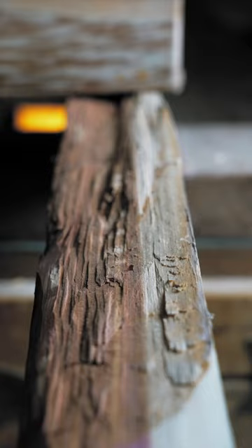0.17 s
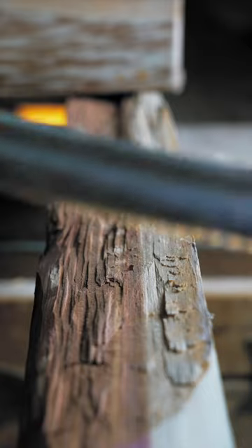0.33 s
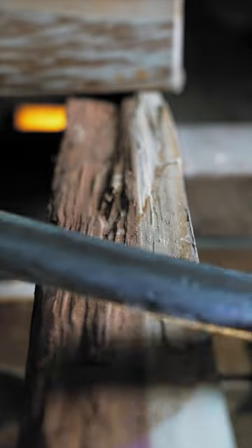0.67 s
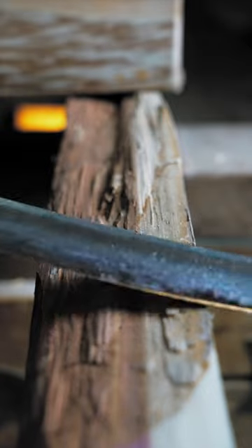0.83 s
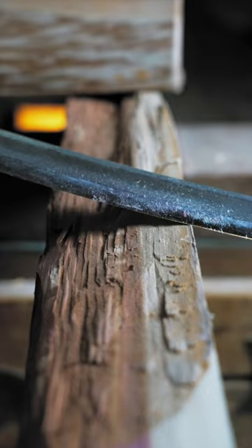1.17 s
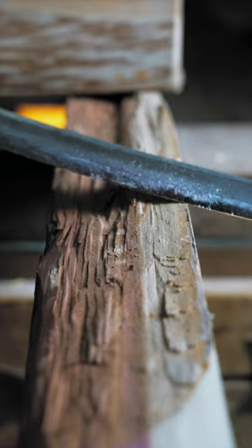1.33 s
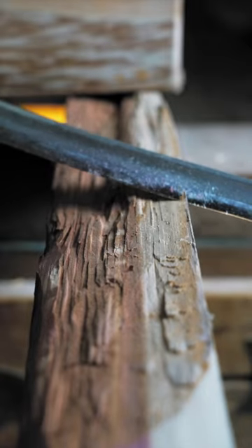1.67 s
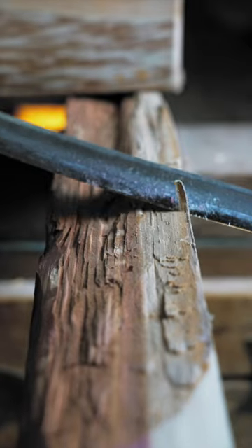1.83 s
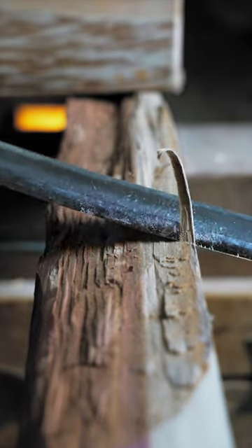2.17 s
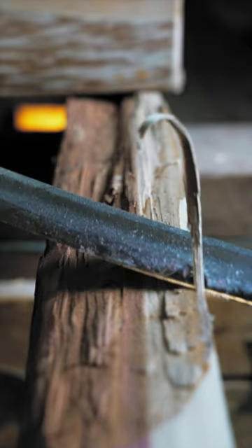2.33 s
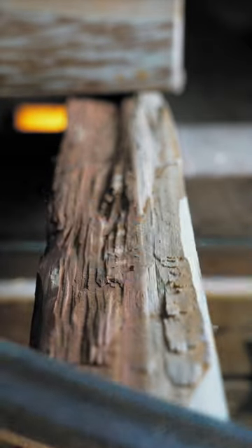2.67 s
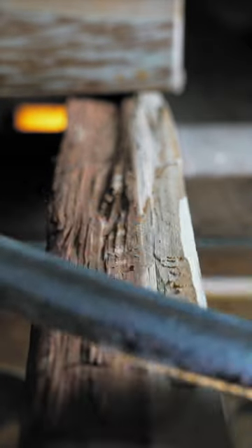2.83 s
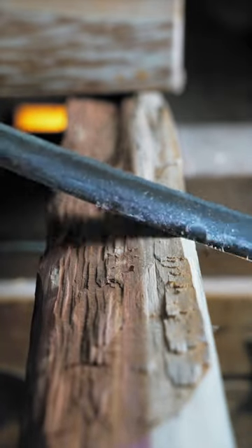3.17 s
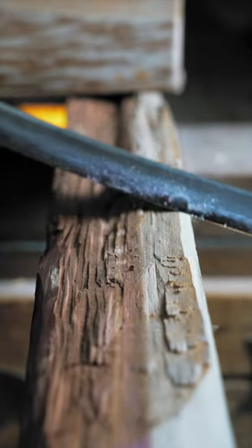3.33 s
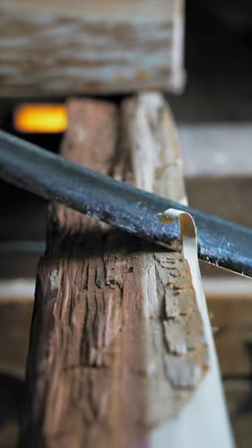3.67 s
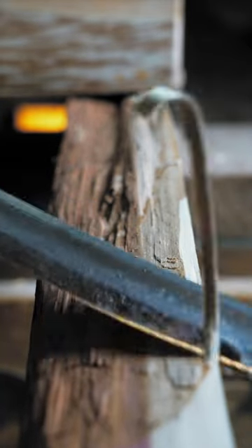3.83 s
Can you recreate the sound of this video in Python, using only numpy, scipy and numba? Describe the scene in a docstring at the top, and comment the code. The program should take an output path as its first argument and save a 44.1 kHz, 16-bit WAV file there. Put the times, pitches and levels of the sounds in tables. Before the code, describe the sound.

A drawknife rasps along wood twice, shavings crackling, with knocks between the cuts.

```python
"""In a quiet workshop, close up, a drawknife is pulled twice along a wooden stave.
The edge sticks and slips, so blade and stave ring with a rasp and the bench shudders.
Fibres crackle and snap as each shaving peels off. Around the cuts the blade slides lightly,
chips rustle, the bench thuds on the floor, and the stave knocks when the blade is set on it.
Behind it all lie a short room echo, soft air noise and a faint electrical whine."""
import sys
import numpy as np
from scipy import signal
from scipy.fft import rfft, irfft
from scipy.io import wavfile
from scipy.ndimage import uniform_filter1d
from numba import njit

SR = 44100
rng = np.random.default_rng(int(sys.argv[2]) if len(sys.argv) > 2 else 0)


def unload_wav(signal):
    """Save mono or channel-first audio to the path in sys.argv[1] as 16-bit WAV at rate SR, clipped to [-1, 1]."""
    wavfile.write(
        sys.argv[1],
        SR,
        np.round(np.clip(np.atleast_2d(signal).T, -1, 1) * 32767).astype(np.int16),
    )


N = 176400  # 4 seconds

# In the tables t is time and f is frequency. Levels are relative: the functions scale them further.
# tone of the still air: f/Hz, level/dB
AIR_TONE = [(20, 2), (60, 1), (130, -3.5), (220, -3.5), (310, -14), (400, -2.5), (480, 0.5), (570, -14),
            (900, -20.5), (2000, -32), (5500, -32.5), (8400, -37), (9500, -34), (12000, -36.5),
            (14200, -30), (16000, -38.5)]
# electrical whine: f/Hz, level/dB
WHINE_TONES = [(7127, -95.5), (14250, -102)]
# the bench thuds on the floor: t/s, level/dB, decay/s, boom f/Hz
FLOOR_THUDS = [(.53, -47, 0.079, 100), (.59, -48.5, 0.085, 83.7), (0.859, -47, 0.063, 55.3),
               (1.835, -58, 0.26, 44.6), (2.241, -60, 0.044, 70.7), (2.644, -46.5, 0.032, 76),
               (3.209, -47.5, 0.093, 69.1), (3.677, -53.5, 0.066, 90.3)]
# tone of the thuds and the rumble: f/Hz, level/dB
THUD_TONE = [(20, -8), (50, 1.5), (80, -2.5), (110, -7.5), (140, -11), (200, -7.5), (300, -21.5),
             (600, -43), (2000, -69.5)]
# loose chips brushed aside: t/s, level/dB, decay/s, centre f/Hz
CHIP_RUSTLES = [(0.035, -72, 0.1, 10800), (.213, -64.5, 0.026, 8900), (1.165, -73, .015, 12100),
                (2.896, -70.5, 0.018, 5000), (3.139, -64, 0.063, 8850)]
# light slides of the blade: t/s, length/s, blade level/dB, bench level/dB
BLADE_SLIDES = [(0.026, 0.13, -80, -80), (0.846, 0.078, -65, -48.5), (1.102, .14, -76, -60.5),
                (1.255, .19, -77, -61.5), (2.838, .12, -86.5, -68.5), (2.965, .11, -80.5, -75.5)]
# notes that ring in the lightly held blade: f/Hz, width/Hz, level/dB
LOOSE_BLADE_NOTES = [(857, 98, 2.5), (1663, 120, -1), (1814, 70, 0), (2600, 220, 0), (3680, 790, -9),
                     (4380, 114, -8.5), (6460, 2400, -20)]
# notes that ring in stave and bench at pitch ratio 1: f/Hz, level/dB, time to fade by 60 dB/s
BENCH_NOTES = [(74.2, -28.5, 0.35), (184.6, -22, 0.31), (295.4, -14, 0.24), (329, -19, 0.38),
               (413.7, -13, 0.29), (444.7, -4.5, .23), (475, -9, 0.22), (522.6, -13.5, 0.17),
               (676, -24.5, 0.13), (869, -28.5, .15)]
# knocks on the stave: t/s, knock level/dB, crack level/dB, pitch ratio
STAVE_KNOCKS = [(.855, -29.5, -63, 0.92), (.886, -36.5, -62, .96), (2.586, -46, -75, 1.0),
                (2.644, -44, -47.5, 0.97), (3.035, -49, -75, 0.8), (3.202, -15.5, -23.5, 1.017),
                (3.252, -30.5, -56, 1.04)]
# tone of the crack as the blade lands: f/Hz, level/dB
CRACK_TONE = [(100, -6), (350, 5.5), (600, -2), (900, 1), (1350, -0.5), (1600, -3.5), (1850, -6),
              (2100, -16.5), (2600, -10), (3200, -17.5), (4200, -18), (5500, -36), (15000, -46)]
# splinters snapping: t/s, level/dB, centre f/Hz, decay/ms
SPLINTERS = [(0.1023, -50, 8500, 1.4), (.196, -46, 10000, .4), (0.2004, -38, 11500, 0.52),
             (0.214, -35, 12500, 0.63), (1.8075, -41.5, 13000, 1.5), (1.815, -51, 14000, 1),
             (1.85, -36.5, 11900, 0.65), (1.862, -34.5, 12000, 1.2), (1.8951, -32, 13000, 0.95),
             (1.9921, -29, 9000, 1.05), (1.999, -40, 10500, 0.53), (2.02, -35.5, 11000, 0.84),
             (2.121, -33, 14000, .8), (2.2285, -32, 8400, .7), (2.252, -32, 13100, 6.2),
             (2.275, -34, 12500, .6), (2.282, -23.5, 13500, 0.58), (2.336, -25, 13000, 3.6),
             (2.358, -23, 12500, 2), (2.406, -22, 11000, 0.75), (2.452, -34.5, 4800, 0.51),
             (2.456, -23, 5400, 0.52), (2.567, -39.5, 10000, 5.9), (2.596, -30, 8500, 1.35),
             (3.747, -24.5, 12000, 0.4), (3.7665, -21, 12500, 0.6), (3.772, -22.5, 12500, 0.79),
             (3.7973, -26, 14000, 1.7), (3.86, -25, 11600, 1.8), (3.8801, -21, 11500, 1.4),
             (3.977, -37, 8000, 1.5)]
# tone of breaking fibres: f/Hz, level/dB
FIBRE_TONE = [(500, -46), (2500, -19), (5500, -17.5), (7500, -11), (9000, -12), (12000, -3), (14500, -2),
              (16000, -5.5)]
# how hard the fibres tear in each cut: t/s, level/dB
FIRST_TEAR = [(1.58, -90), (1.8, -71), (1.855, -61), (1.893, -46), (1.92, -65), (1.98, -57), (2.015, -54.5),
              (2.185, -66), (2.22, -60), (2.255, -52), (2.328, -46), (2.338, -40), (2.403, -40),
              (2.425, -48.5), (2.48, -53.5), (2.55, -58), (2.6, -71), (2.7, -95)]
SECOND_TEAR = [(3.5, -98.5), (3.6, -66.5), (3.734, -45.5), (3.75, -35.5), (3.785, -41.5), (3.803, -36.5),
               (3.84, -41), (3.857, -33), (3.905, -54.5), (4.0, -59.5)]
# ringing shavings: start t/s, end t/s, start f/Hz, end f/Hz, level/dB above the tearing
SHAVING_GLIDES = [(2.325, 2.422, 13720, 9700, 2), (3.771, 3.833, 15000, 12700, 1)]
# notes that ring in blade and stave while cutting: f/Hz, width/Hz, level/dB
BLADE_NOTES = [(869, 60, 4.5), (949, 56, 2), (1163, 53, 3.5), (1287, 120, -14), (1820.5, 61, -2),
               (2394, 200, -30), (2610, 180, -11), (2840, 150, -21), (3637, 70, -2.5), (4390, 160, -20.5),
               (4697, 81, -10.5), (5585, 110, -24.5), (6310, 260, -13)]
# tone of the broad scrape under those notes: f/Hz, level/dB
SCRAPE_TONE = [(200, -33), (600, -7), (1200, -15), (1550, -18.5), (2500, -10), (4200, -14.5), (5200, -22),
               (8000, -20.5), (16000, -35)]
# how loud each cut is: t/s, rasp level/dB, shudder level/dB
FIRST_CUT = [(1.55, -100, -79), (1.65, -68, -69.5), (1.74, -64, -74), (1.9, -52.5, -64.5),
             (1.976, -62, -57), (2.0, -52.5, -62.5), (2.13, -62.5, -61.5), (2.184, -70, -77),
             (2.25, -50.5, -69), (2.298, -56, -54.5), (2.388, -59.5, -71.5), (2.422, -54, -46.5),
             (2.472, -55, -52), (2.548, -73.5, -69), (2.598, -54, -55.5), (2.628, -68, -60.5),
             (2.656, -66, -54), (2.722, -85.5, -60.5), (2.75, -83, -70)]
SECOND_CUT = [(3.48, -88, -101), (3.566, -57, -80), (3.618, -50, -58.5), (3.682, -51.5, -53.5),
              (3.736, -52, -61.5), (3.816, -48, -48), (3.876, -50.5, -48), (3.908, -62, -59),
              (4.0, -64.5, -72)]

SLIPS_PER_S, SLIP_SPREAD_DB = 5000, 3
FIBRES_PER_S, FIBRE_SPREAD_DB = 4500, 4
TIME = np.arange(N) / SR


def gain(db):
    """Turn decibels into a number to multiply by."""
    return 10 ** (np.asarray(db) / 20)


def unit(x):
    """Scale a sound so that its typical swing (rms) is 1."""
    return x / (np.std(x) + 1e-18)


def peak(x):
    """Scale a sound so that its biggest swing is 1."""
    return x / (np.abs(x).max() + 1e-18)


def clock(seconds):
    """The time of each sample in a short sound."""
    return np.arange(int(seconds * SR)) / SR


def add(out, at, x):
    """Mix x into out, starting at a time in seconds."""
    i = max(int(at * SR), 0)
    out[i:i + len(x)] += x[:len(out[i:])]


def through(x, response):
    """Let every sample of x set off its own copy of a ring or echo."""
    return signal.fftconvolve(x, response)[:len(x)]


def colour(x, tone, size=4096):
    """Make the lows and highs of x louder or softer, following a tone table."""
    hz, db = np.array(tone).T
    f = np.maximum(np.arange(size // 2 + 1) * SR / size, 1)
    curve = gain(np.interp(np.log(f), np.log(hz), db))
    # folding the cepstrum makes the filter ring only after a sound, never before it
    cepstrum = irfft(np.log(curve))
    cepstrum[1:size // 2] *= 2
    cepstrum[size // 2 + 1:] = 0
    return through(x, irfft(np.exp(rfft(cepstrum))))


@njit
def moving_band(x, hz, width):
    """A filter that lets through the sound near a pitch, given for each sample."""
    out, band_state, low_state = np.empty(len(x)), 0., 0.
    for i in range(len(x)):
        angle = 2 * np.pi * min(hz[i], .44 * SR) / SR
        step = np.tan(angle / 2)
        damping = 2 * np.pi * width / SR / np.sin(angle)
        swing = (band_state + step * (x[i] + 1e-18 - low_state)) / (1 + step * (step + damping))
        band_state = 2 * swing - band_state
        low_state += 2 * step * swing
        out[i] = damping * swing
    return out


def band(x, hz, *widths):
    """Keep the sound near a pitch, filtering once for each width in Hz."""
    for width in widths:
        x = moving_band(x, hz * np.ones(len(x)), float(width))
    return x


def wander(per_s):
    """A smooth random drift of typical size 1."""
    hold = int(SR / per_s)
    steps = np.repeat(rng.standard_normal(4000)[:N // hold + 1], hold)
    return unit(uniform_filter1d(steps, hold)[:N])


def clicks(per_s, spread_db):
    """Dense random clicks, most small and a few large."""
    size = gain(spread_db * np.minimum(rng.exponential(size=N), 4))
    return (rng.random(N) < per_s / SR) * size * rng.choice([-1, 1], N)


def effort(*curves, column=1):
    """Strength over time, joining the points in one level column of each table."""
    return sum(gain(np.interp(TIME, points[:, 0], points[:, column], left=-200, right=-200))
               for points in map(np.array, curves))


def gate(start, end, ramp_s):
    """Fade in, hold, fade out."""
    return np.clip(np.minimum(TIME - start, end - TIME) / ramp_s, 0, 1)


def room_tone(air_db=-66.5):
    """Still air with a faint electrical whine."""
    air = unit(colour(rng.standard_normal(N), AIR_TONE))
    whine = sum(np.sqrt(2) * gain(db) * np.sin(2 * np.pi * hz * TIME) for hz, db in WHINE_TONES)
    return gain(air_db) * air + whine


def room_echo(x, level_db=-12, low_fade_s=.34, high_fade_s=.18, rise_s=.0027):
    """Sound bounces around the workshop; the highs die away first."""
    t = clock(.6)
    noise = rng.standard_normal(len(t))
    low = signal.sosfilt(signal.butter(2, 4500, fs=SR, output="sos"), noise)
    tail = low * gain(-60 * t / low_fade_s) + (noise - low) * gain(-60 * t / high_fade_s)
    tail *= 1 - np.exp(-t / rise_s)
    return gain(level_db) * through(x, tail / np.linalg.norm(tail))


def thuds(rise_s=.0041):
    """The bench shifts on the floor under the worker's weight, with a dull boom."""
    out, t = np.zeros(N), clock(.6)
    for at, db, decay, hz in FLOOR_THUDS:
        push = unit(colour(rng.standard_normal(len(t)), THUD_TONE))
        boom = unit(push + gain(1.5) * np.sin(2 * np.pi * hz * t))
        add(out, at, gain(db) * boom * np.minimum(t / rise_s, 1) * np.exp(-t / decay))
    return out


def chips(width_hz=27000):
    """Loose chips rustle softly as they are brushed aside."""
    out, t = np.zeros(N), clock(.25)
    for at, db, decay, hz in CHIP_RUSTLES:
        ticks = clicks(FIBRES_PER_S, SLIP_SPREAD_DB)[:len(t)]
        rustle = unit(band(ticks, hz, width_hz))
        add(out, at, gain(db) * rustle * np.exp(-t / decay))
    return out


def bench_ring(pitch):
    """After one push, stave and bench ring with several fading notes."""
    t = clock(.6)
    return sum(gain(db) * gain(-60 * t / fade_s) * np.sin(2 * np.pi * hz * pitch * t)
               for hz, db, fade_s in BENCH_NOTES)


def shudder():
    """The dragging edge shakes the bench with many tiny pushes."""
    return unit(through(clicks(SLIPS_PER_S, SLIP_SPREAD_DB), bench_ring(pitch=.98)))


def rubbing(notes, grain_db=2.5):
    """The edge sticks and slips unevenly, and each slip sets the notes ringing."""
    slips = clicks(SLIPS_PER_S, SLIP_SPREAD_DB) * gain(grain_db * wander(per_s=70))
    return sum(gain(db) * band(slips, hz, width, 4 * width) for hz, width, db in notes)


def slides():
    """The blade rubs lightly over the wood, and the bench sounds with it."""
    blade = unit(rubbing(LOOSE_BLADE_NOTES))
    bench = unit(band(shudder(), 421, 150))
    return sum(gate(at, at + length, ramp_s=.021) * (gain(blade_db) * blade + gain(bench_db) * bench)
               for at, length, blade_db, bench_db in BLADE_SLIDES)


def knocks(swing_at_s=.0143, swing_width_s=.0047, ring_rise_s=.0091, crack_s=.0066, tail_s=.054):
    """The blade lands with a short crack; the bench swings once strongly and rings on."""
    out, t = np.zeros(N), clock(.6)
    for at, db, crack_db, pitch in STAVE_KNOCKS:
        swell = np.exp(-((t - swing_at_s) / swing_width_s) ** 2)
        swing = swell * np.sin(2 * np.pi * 452 * pitch * t)
        ring = peak(bench_ring(pitch) * (1 - np.exp(-t / ring_rise_s)))
        fade = np.exp(-t / crack_s) + gain(-19.5) * np.exp(-t / tail_s)
        crack = colour(rng.standard_normal(len(t)) * fade, CRACK_TONE)
        add(out, at, gain(db) * peak(gain(7) * swing + ring) + gain(crack_db) * peak(crack))
    return out


def snaps(tick_width_hz=7700, body_hz=3300, body_width_hz=3600, trim_db=-.5):
    """Each splinter breaks with a tiny bright tick and a softer woody middle."""
    out, t = np.zeros(N), clock(.02)
    for at, db, hz, decay_ms in SPLINTERS:
        burst = rng.standard_normal(len(t)) * np.exp(-1000 * t / decay_ms)
        tick = band(burst, hz, tick_width_hz, 2 * tick_width_hz)
        body = gain(-18) * band(burst, body_hz, body_width_hz)
        add(out, at, gain(db + trim_db) * peak(tick + body))
    return out


def tearing(bunch_db=1.5, ring_width_hz=1600, trim_db=-.5):
    """Fibres break in bunches; the shaving rings lower and lower as it grows longer."""
    breaks = clicks(FIBRES_PER_S, FIBRE_SPREAD_DB) * gain(bunch_db * wander(per_s=220))
    crackle = unit(colour(breaks, FIBRE_TONE))
    for start, end, start_hz, end_hz, db in SHAVING_GLIDES:
        hz = np.interp(TIME, [start, end], [start_hz, end_hz])
        ring = band(clicks(FIBRES_PER_S, FIBRE_SPREAD_DB), hz, ring_width_hz, ring_width_hz)
        crackle += gain(db) * gate(start, end, ramp_s=.01) * unit(ring)
    return gain(trim_db) * effort(FIRST_TEAR, SECOND_TEAR) * crackle


def rasp():
    """The biting edge makes blade and stave ring over a broad scrape."""
    ring = rubbing(BLADE_NOTES)
    scrape = colour(clicks(SLIPS_PER_S, SLIP_SPREAD_DB), SCRAPE_TONE)
    return unit(ring + scrape)


def cuts(rasp_db=-.5, rumble_db=-10):
    """The knife is pulled through the wood twice: a rasp, a low rumble and a woody shudder."""
    shake = shudder()
    woody_noise = unit(band(rng.standard_normal(N), 370, 260, 260))
    bench = unit(shake + gain(1.5) * woody_noise)
    rumble = unit(colour(rng.standard_normal(N), THUD_TONE))
    edge = gain(rasp_db) * rasp() + gain(rumble_db) * rumble
    return effort(FIRST_CUT, SECOND_CUT) * edge + effort(FIRST_CUT, SECOND_CUT, column=2) * bench


def scene():
    """All the work at the bench, in its room, as one channel."""
    wood = cuts() + slides() + knocks() + thuds()
    fibres = tearing() + snaps() + chips()
    echo = room_echo(wood + gain(-1) * fibres)
    return (wood + fibres + echo + room_tone())[None]


def record(dry, start_s=.036, top_hz=16000):
    """The sound begins after a moment of silence, and its very highest part is cut away."""
    low_pass = signal.ellip(10, .2, 70, top_hz, fs=SR, output="sos")
    return signal.sosfilt(low_pass, dry * (TIME > start_s))


dry = scene()
out = record(dry)
unload_wav(out)
```